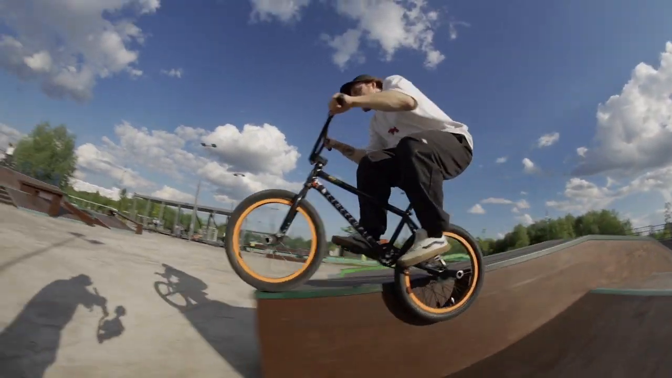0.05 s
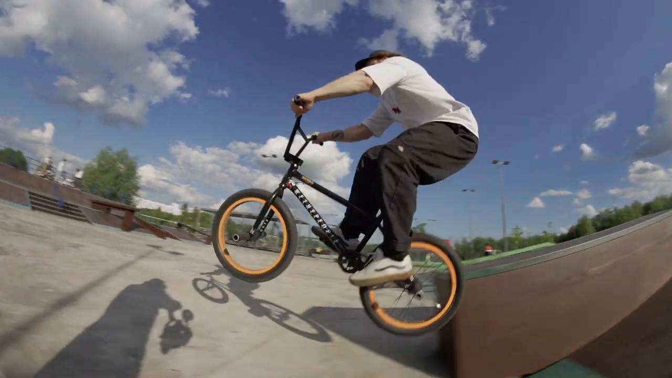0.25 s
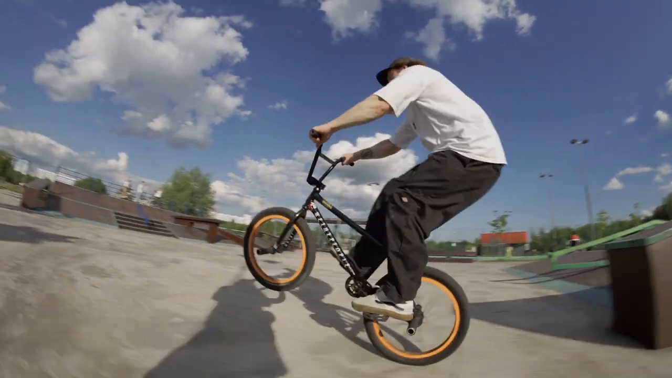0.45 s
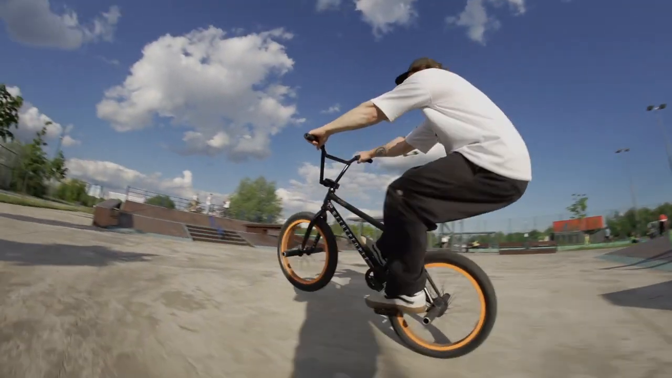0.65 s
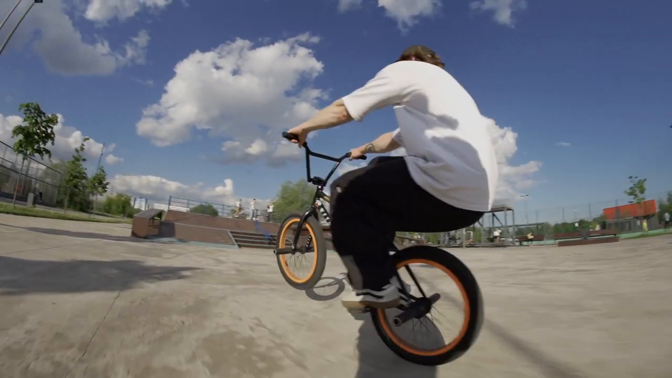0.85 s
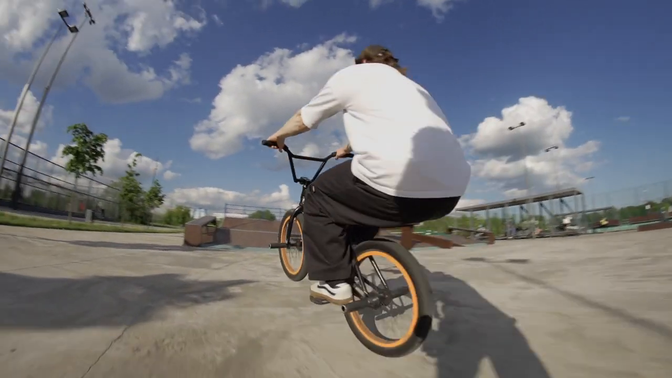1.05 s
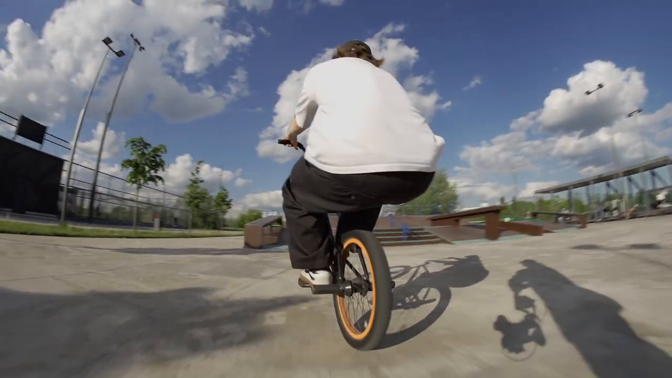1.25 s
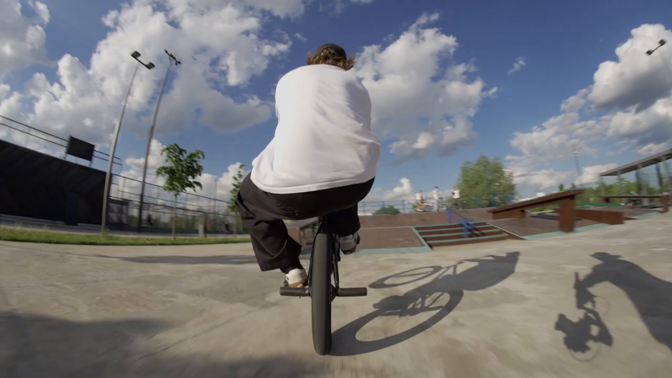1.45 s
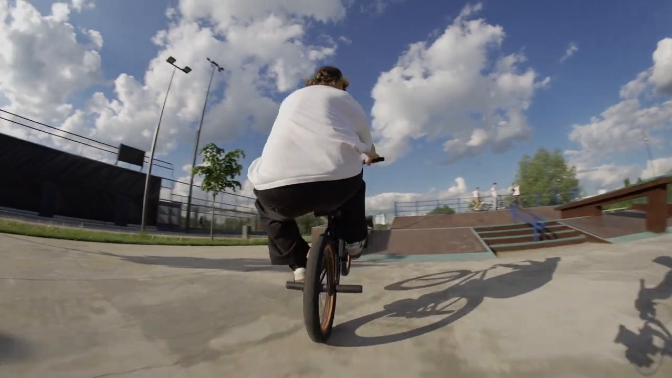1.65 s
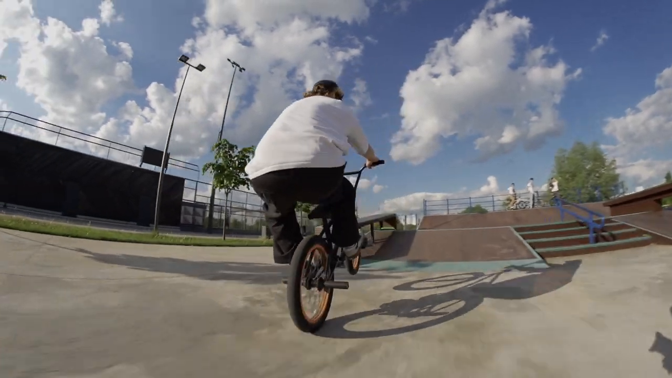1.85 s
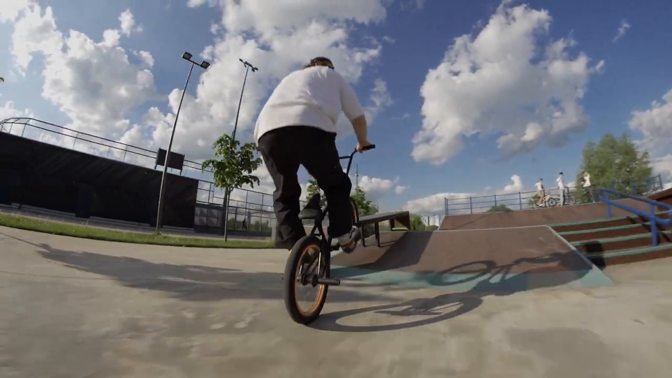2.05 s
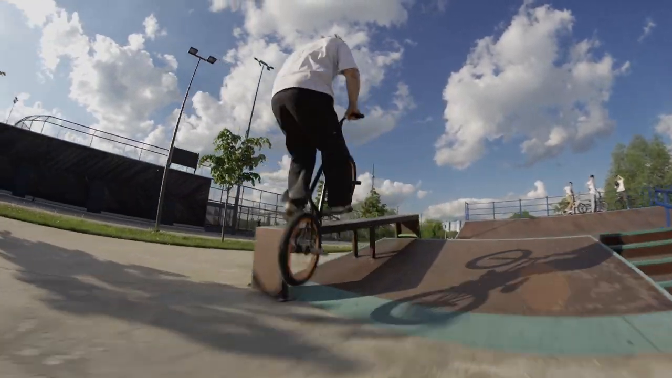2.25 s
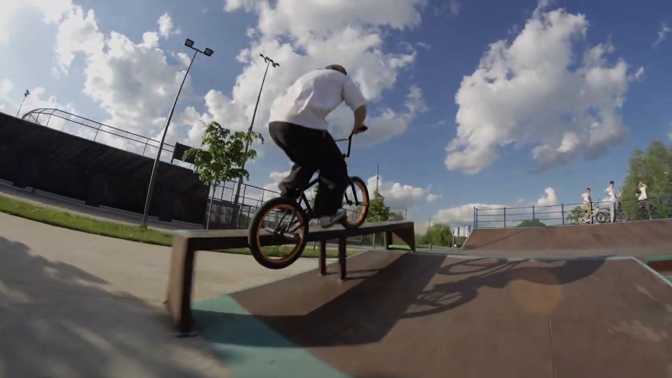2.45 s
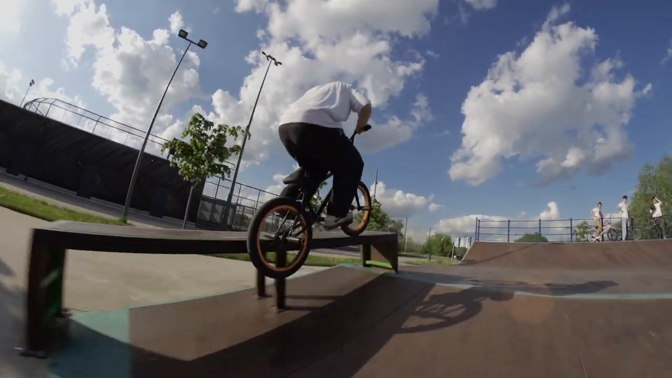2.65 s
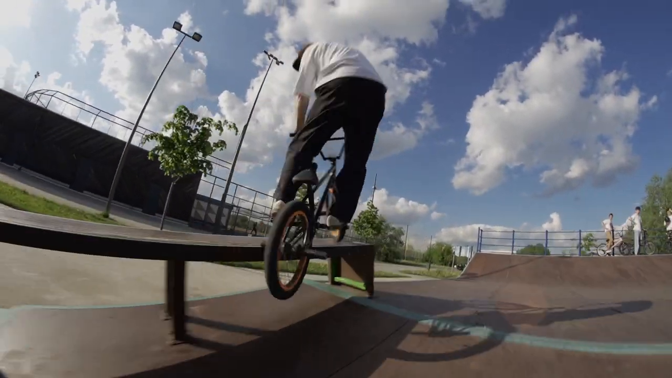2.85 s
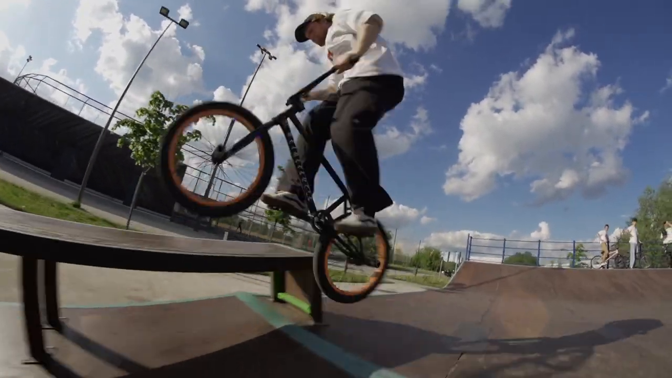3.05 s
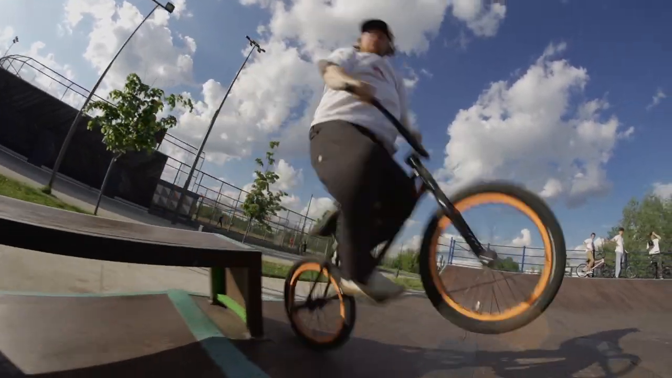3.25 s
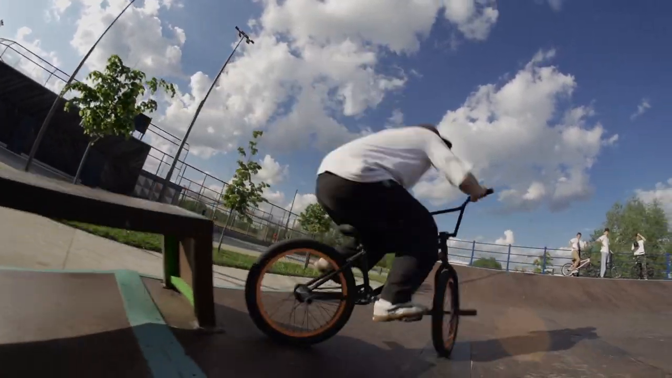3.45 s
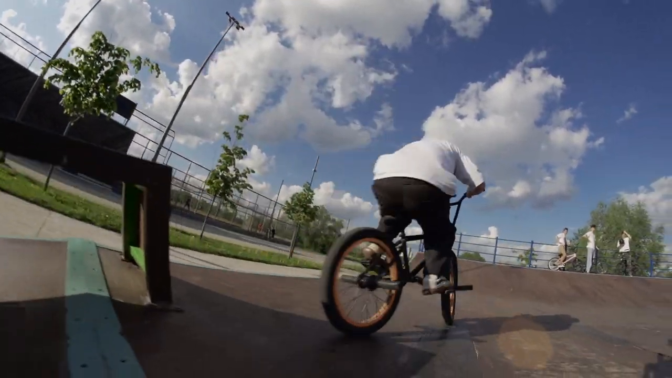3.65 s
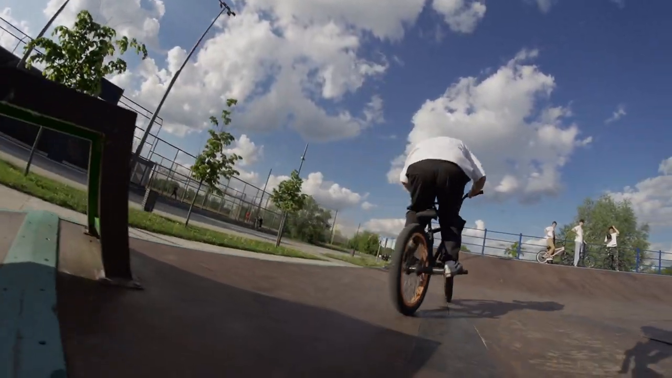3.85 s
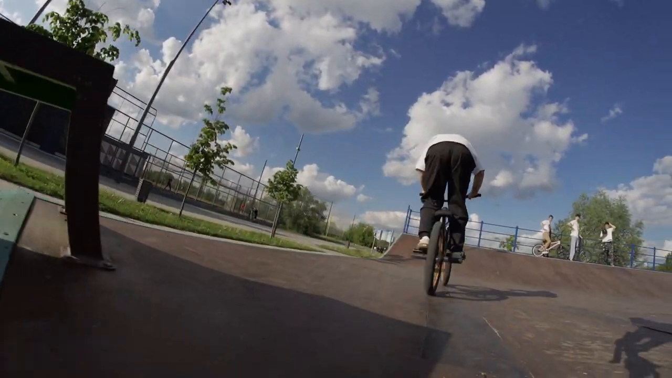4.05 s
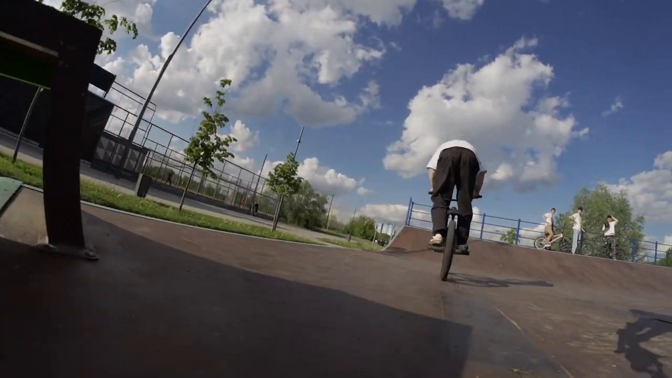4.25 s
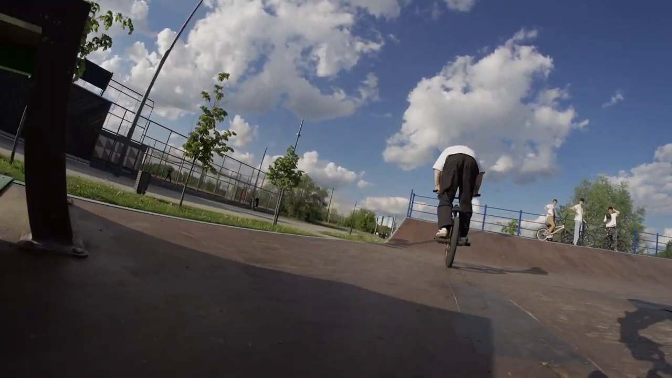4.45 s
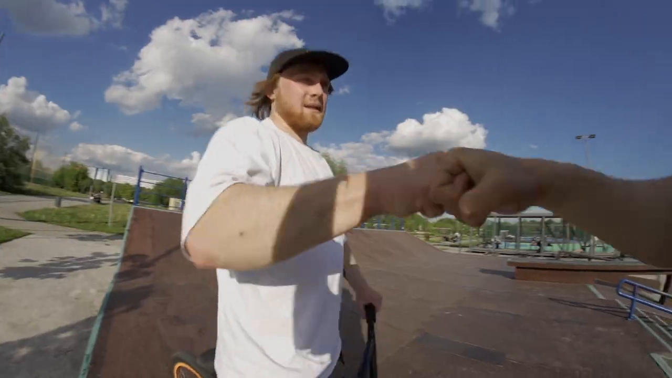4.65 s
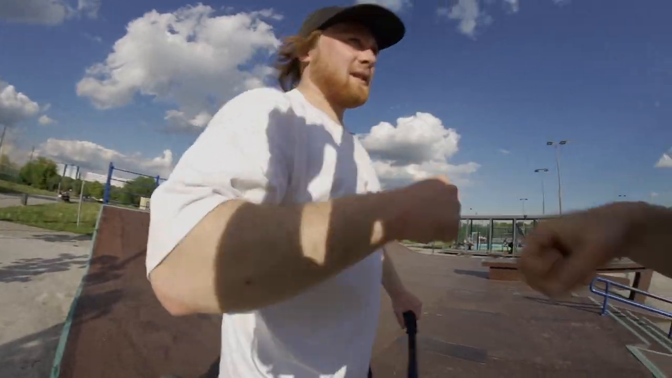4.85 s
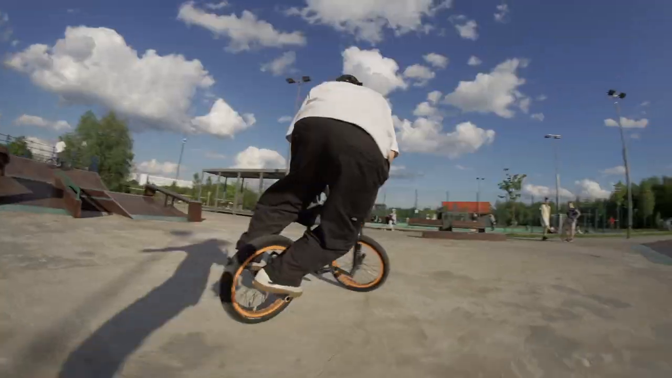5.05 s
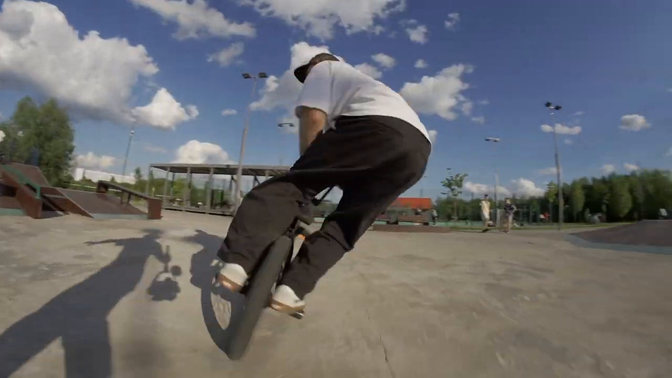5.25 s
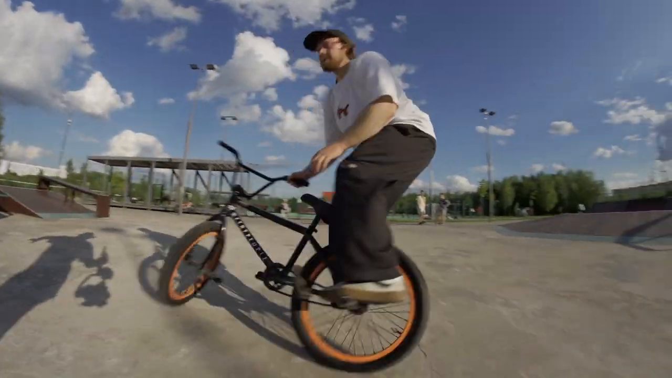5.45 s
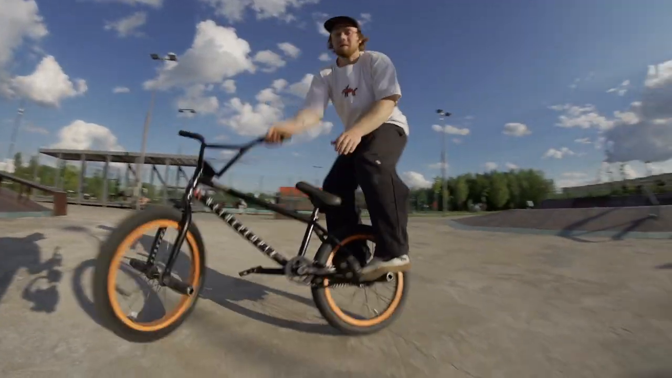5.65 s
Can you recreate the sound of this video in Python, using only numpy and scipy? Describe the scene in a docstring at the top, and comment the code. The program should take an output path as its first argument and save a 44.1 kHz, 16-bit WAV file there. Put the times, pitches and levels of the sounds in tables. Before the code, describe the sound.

Skatepark bike run: hollow rumble, sharp clack, quiet rolling, a ringing metal rail scrape, heavy landing, thin falling squeak, and a gritty tyre skid in wind.

```python
"""A BMX bike in a skatepark: it drums over a hollow ramp, clacks onto concrete, grinds a steel rail and lands on a bank.
A thin squeak falls away, then a tyre skids through a turn, with a fist bump early on; wind rumbles on the microphone.
Rolling, scraping and skidding are random contacts coloured by each surface; blows, ticks and the bump are noise bursts.
Tyre thumps are damped sines, the rail is a set of ringing modes, and rubber squeals are blurred stick-slip tones."""
import sys
import numpy as np
from scipy import signal
from scipy.fft import rfft, irfft, next_fast_len
from scipy.io import wavfile
from scipy.ndimage import uniform_filter1d, map_coordinates

SR = 44100
rng = np.random.default_rng(int(sys.argv[2]) if len(sys.argv) > 2 else 0)


def dump(signal):
    """Clip the signal to [-1, 1] and save it as 16-bit WAV at the path in sys.argv[1]."""
    limited = np.clip(np.atleast_2d(signal).T, -1, 1)
    pcm = np.round(limited * 32767).astype(np.int16)
    wavfile.write(sys.argv[1], SR, pcm)


N = 251811

# In all tables and settings, t60_s is the time to die by 60 dB; attacks and rises build by 60 dB.

# stretches of rolling: touch_down_s, lift_off_s, level_db (at touch-down, before unevenness), t60_s
ROLL_STRETCHES = [(0.251, 0.53, -42.5, 2.1), (0.593, 2.12, -45, 0.16), (2.122, 2.196, -39.5, 0.16),
                  (2.23, 2.29, -50, 2), (2.923, 3.173, -48.5, 1.9), (3.48, 3.542, -48, 2.55),
                  (5.41, 5.616, -54, 1.4)]
# hard blows: start_s, crack_db, thud_db, frame_ring_db (burst levels before trim and colour), crack_t60_s
HARD_BLOWS = [(0.3923, -15.5, -18.5, -11.5, 0.023), (0.3943, -19.5, -19, -9.5, 0.018),
              (0.856, -40, -45, -59, 0.13), (2.27, -39, -41, -66, 0.02), (2.459, -28.5, -26.5, -29.5, 0.63),
              (2.494, -16.5, -30, -21, 0.058), (2.4996, -7, -6, -41, 0.19), (2.658, -22, -17, -33, 0.082),
              (3.1158, -42, -27, -65, 0.38), (3.3129, -7.5, -20, -22.5, 0.017),
              (3.4723, -14.5, -7, -54, 0.046), (3.478, -26, -4, -47, 0.24)]
# soft tyre thumps: start_s, level_db, pitch_hz, t60_s
TYRE_THUMPS = [(0.048, -6.5, 200, 0.062), (.12, -17, 152, .07), (.227, -6.5, 155, 0.06),
               (.272, -9, 305, 0.046), (1.121, -23, 368, 0.039), (1.989, -23, 107, 0.085),
               (2.798, -7, 243, 0.12), (2.822, -12, 383, 0.039), (3.128, -13.5, 73.7, 0.24),
               (3.478, -15, 193, 0.18), (3.488, -11.5, 374, 0.07), (3.497, -9.5, 170, 0.06),
               (4.109, -24.5, 254.3, 0.095), (4.511, -23.5, 248, 0.034), (5.202, -8.5, 131, 0.013),
               (5.307, -6.5, 144.6, 0.14)]
# wheels loading the bank: start_s, shudder_db, t60_s
BANK_LOADS = [(3.135, -21.5, 0.23), (3.325, -16.5, 1), (3.495, -14, 0.37)]
# drops that set loose bike parts rattling: start_s, level_db, t60_s
PART_RATTLES = [(.402, -25.5, 0.3), (3.32, -32.5, 1), (3.485, -33, 0.49)]
# grit and small bike ticks, and a fist bump at 4.628 s: start_s, level_db (before the snap and tail offsets)
TICKS_AND_BUMP = [(0.639, -36.5), (1.295, -41), (1.394, -41), (1.9785, -36.5), (2.8472, -20.5),
                  (3.1838, -33), (3.533, -37), (3.628, -32), (3.639, -30.5), (3.794, -35.5), (4.628, -17)]
# the steel rail's modes: pitch_hz, level_db (within the ring), t60_s
RAIL_MODES = [(1016, -4, 0.17), (1146, 5, 0.49), (1253, 0.5, 0.27), (1370, 1, 0.5), (1642, -14, 0.33),
              (1733, -12, 0.4), (1846, -5.5, 0.29), (1985, -12, 0.29)]
# the bike frame's resonances: centre_hz, width_hz, gain_db
FRAME_RESONANCES = [(3230, 425, 11), (3820, 1400, 1.5), (5800, 480, -1.5), (7600, 880, -0.5)]
# the skidding tyre's resonances: centre_hz, width_hz, gain_db
TYRE_RESONANCES = [(1080, 480, 0.5), (2310, 380, 5), (3150, 200, 4.5)]
# harder scuffs of the tyre within the turn: start_s, slip_hz, level_db
TYRE_SCUFFS = [(5.032, 1130, -38), (5.065, 1130, -39), (5.115, 1118, -30), (5.18, 1150, -29.5),
               (5.414, 812, -29.5)]
# squeals of a tyre at the ramp's lip, the peg at the rail's end and the landing tyre:
# start_s, end_s, pitch_hz, glide_hz_per_s, level_db
SHORT_SQUEALS = [(0.241, 0.286, 2390, 1201, -39), (2.815, 2.874, 5460, 16000, -43),
                 (3.43, 3.469, 4520, -1000, -30)]
# path of the thin falling squeak: time_s, pitch_hz, level_db
THIN_SQUEAK = [(4.09, 2370, -73), (4.166, 2230, -57.5), (4.22, 2180, -46.5), (4.277, 2040, -48),
               (4.323, 2030, -48.5), (4.362, 2186, -70), (4.412, 1980, -52), (4.492, 1895, -62)]
# wind gusts on the microphone: peak_s, level_db
WIND_GUSTS = [(.57, -23), (1.28, -23), (1.52, -14), (1.95, -27.5), (2.38, -19.5), (3.18, -26),
              (3.42, -23.5), (4.759, -21.5), (4.92, -13.5), (5.2, -15)]

# Colours give relative balance only; columns of each: frequency_hz, gain_db
# tyre tread on concrete: frequency_hz, gain_db
CONCRETE_COLOUR = [(90, -1.5), (230, -9), (380, -8), (900, -15.5), (1300, -16), (3400, -28), (5000, -33.5),
                   (7700, -33), (10500, -42.5), (16000, -43.5)]
# boom of the hollow ramp, also the slap under a thump: frequency_hz, gain_db
BOOM_COLOUR = [(60, -31.5), (95, -5), (152, 4), (215, -7), (480, -6.5), (900, -21.5)]
# tread on the ramp: frequency_hz, gain_db
TREAD_COLOUR = [(600, -4.5), (1000, 1.5), (1660, -7.5), (2600, -14.5), (4000, -23.5), (8000, -31.5),
                (11000, -40), (16000, -40.5)]
# crack of a blow: frequency_hz, gain_db
CRACK_COLOUR = [(150, -13), (500, 16), (2000, 7), (4000, 2), (8000, -7.5), (11000, -19), (16000, -20)]
# thud of the struck surface: frequency_hz, gain_db
THUD_COLOUR = [(30, -6.5), (100, -5.5), (220, 3.5), (500, -4), (1000, -14), (2500, -24.5)]
# shuddering bank: frequency_hz, gain_db
SHUDDER_COLOUR = [(40, 3.5), (100, 4.5), (160, -1), (400, -7), (650, -17), (1000, -23)]
# loose bike parts: frequency_hz, gain_db
PARTS_COLOUR = [(300, 10), (700, 5), (3000, -2.5), (6000, -9), (10000, -14.5), (16000, -15.5)]
# ledge shaken by the grind: frequency_hz, gain_db
LEDGE_COLOUR = [(70, -5.5), (140, -4), (215, 1), (400, -3), (600, -5), (900, -15.5)]
# peg scraping on steel: frequency_hz, gain_db
SCRAPE_COLOUR = [(600, -12), (1000, -5), (1250, 3), (1550, -6.5), (2000, -6.5), (3300, -16), (6000, -37)]
# fine hiss of the grind: frequency_hz, gain_db
HISS_COLOUR = [(3500, -0.5), (6200, -2.5), (9000, -4), (10500, -16), (16000, -13.5)]
# rubber rubbing sideways: frequency_hz, gain_db
RUB_COLOUR = [(150, -12), (330, -11), (700, -12), (1600, -16), (3000, -21.5), (4400, -21), (5600, -30),
              (7300, -27.5), (10500, -49)]
# sprayed grit: frequency_hz, gain_db
GRIT_COLOUR = [(1500, -16), (3000, 3), (5000, 1), (6500, -4), (8500, 2), (13000, 1), (16000, -3)]
# rough tyre drag: frequency_hz, gain_db
DRAG_COLOUR = [(2200, -8), (4600, 1), (7000, -18), (9500, -12), (15000, -23)]
# wind buffeting the microphone: frequency_hz, gain_db
BUFFET_COLOUR = [(12, 8), (22, 6), (45, -11), (65, -15), (150, -33.5)]
# ticks and the fist bump: frequency_hz, gain_db
TICK_COLOUR = [(400, 2.0), (3000, -3.0), (8000, 1.5), (16000, -15.0)]

ROLL_GROWS_DB_PER_S = 0.5  # within each stretch
TOUCH_S = 0.066  # how fast a rolling tyre's sound builds at touch-down
AIR_DB = -56.5  # the open park, before the unevenness shared with the rolling
RAMP_END_S, RAMP_BOOM_DB, RAMP_T60_S = 0.282, -19, 0.24
# the tread bites hardest in the curve of the ramp
TREAD_PEAK_S, TREAD_RISE_S, RAMP_TREAD_DB = 0.029, 5.9, -23.5
TREAD_T60_S, TREAD_SAG_DB_PER_S = 0.12, 33.5
SLAP_DB, SLAP_T60_S = -15, 0.043  # the slap under each thump, relative to its note
PEG_ON_S, PEG_OFF_S = 2.502, 2.906  # the peg lands on the rail and leaves it
PEG_ATTACK_S, PEG_RELEASE_S = 0.02, 0.26
LEDGE_DB, LEDGE_SAG_DB_PER_S = -12.5, 32
SCRAPE_DB, SCRAPE_SAG_DB_PER_S = -14, 64.5
HISS_DB, HISS_SAG_DB_PER_S = -39, 11.5
SKID_START_S, SKID_PEAK_S, SKID_END_S = 4.471, 5.092, 5.44  # breaks loose, slides fastest, grips again
SKID_ATTACK_S, SKID_RELEASE_S = 0.086, 0.27
RUB_DB, RUB_GROWS_DB_PER_S, RUB_END_S, RUB_T60_S = -46, 12.5, 5.616, 0.59
GRIT_DB, GRIT_RISE_DB_PER_S, GRIT_FALL_DB_PER_S = -35, 21.5, 25  # level at the fastest slide
CHATTER_HZ, CHATTER_DB = 1170, -38.5  # at the fastest slide
CHATTER_SPAN_S, CHATTER_DROP_HZ, CHATTER_DROP_DB = 0.25, 93, 9.5  # so much lower and weaker at this distance
CHATTER_WANDER_HZ = 45.35  # the load on the tyre keeps shifting
SCUFF_RISE_S, SCUFF_FALL_S = 0.083, 0.089
SCUFF_SPRAY_DB = -12  # grit thrown up by a scuff, relative to its squeal
SCRATCH_FROM_S, SCRATCH_TO_S, SCRATCH_DB = 4.83, 4.94, -40
SQUEAL_RISE_S, SQUEAL_FALL_S, SQUEAL_WAVER_HZ = 0.19, 0.072, 162.2
DRAG_FROM_S, DRAG_TO_S, DRAG_DB = 3.335, 3.467, -36.5
CALM_DB, GUST_RISE_S, GUST_FALL_S = -48, 1.7, 1.4  # calm is the wind between gusts
TOP_HZ = 16000  # the top of the finished sound's band


def rolling():
    """Tread blocks patter on concrete over the park's faint hush, and drum on the hollow ramp."""
    stretches = [envelope(on, off, db, TOUCH_S, t60, -ROLL_GROWS_DB_PER_S)
                 for on, off, db, t60 in ROLL_STRETCHES]
    contact = np.max(stretches, axis=0)
    uneven = amp(1 + 0.8 * wobble(14))  # flutters around a 1 dB lift
    patter = patchy(grains(CONCRETE_COLOUR, rate=12000, spread_db=1.77), depth_db=2.5, size=512)
    concrete = uneven * np.hypot(contact, amp(AIR_DB)) * patter

    boom = envelope(0, RAMP_END_S, RAMP_BOOM_DB, TOUCH_S, RAMP_T60_S)
    tread = envelope(TREAD_PEAK_S, RAMP_END_S, RAMP_TREAD_DB, TREAD_RISE_S, TREAD_T60_S, TREAD_SAG_DB_PER_S)
    ramp = boom * patchy(grains(BOOM_COLOUR, rate=4000, spread_db=1), depth_db=4.5, size=2048)
    ramp += tread * patchy(grains(TREAD_COLOUR, rate=6000, spread_db=1), depth_db=4.5, size=512)
    return concrete + ramp


def blows():
    """Each blow is a sharp crack, a thud of the surface and a short ring of the frame."""
    cracks, thuds, rings = np.zeros((3, N))
    for s, crack_db, thud_db, ring_db, crack_t60 in HARD_BLOWS:
        add(cracks, s, amp(crack_db - 0.5) * burst(crack_t60))
        add(thuds, s, amp(thud_db) * burst(0.083))
        add(rings, s, amp(ring_db + 8.5) * burst(0.017))
    return coloured(cracks, CRACK_COLOUR) + coloured(thuds, THUD_COLOUR) + resonate(rings, FRAME_RESONANCES)


def thumps():
    """A loaded tyre gives one low damped note, with a little slap."""
    notes, slaps = np.zeros((2, N))
    t = np.arange(SR // 2) / SR
    onset = 1 - np.exp(-t / 0.00069)  # softens the first millisecond
    for s, db, hz, t60 in TYRE_THUMPS:
        add(notes, s, amp(db - 60 * t / t60) * onset * np.sin(2 * np.pi * hz * t))
        add(slaps, s, amp(db + SLAP_DB) * burst(SLAP_T60_S))
    return notes + coloured(slaps, BOOM_COLOUR)


def landings():
    """Jolts set the bank shuddering and loose bike parts rattling, and both settle at their own pace."""
    bank = shaken(BANK_LOADS, attack=0.042) * grains(SHUDDER_COLOUR, rate=4000, spread_db=2.5)
    parts = shaken(PART_RATTLES, attack=0.012) * grains(PARTS_COLOUR, rate=7200, spread_db=4)
    return bank + parts


def peg_slide(db, sag_db_per_s):
    """Gain of one layer while the peg rubs the rail, pressing ever more lightly."""
    return envelope(PEG_ON_S, PEG_OFF_S, db, PEG_ATTACK_S, PEG_RELEASE_S, sag_db_per_s)


def rail_ring(scrape):
    """Each steel mode stores the scraping energy and lets it go at its own speed."""
    t = clock()
    ring = np.zeros(N)
    for hz, db, t60 in RAIL_MODES:
        memory = amp(-120 * t[:SR] / t60)  # energy decay: 60 dB is a factor of a million
        energy = np.abs(signal.fftconvolve(scrape ** 2, memory / memory.sum())[:N])
        level = amp(db + 1.5 * wobble(25)) * np.sqrt(energy)
        ring += level * np.sin(2 * np.pi * hz * t + 0.6 * wobble(25))
    # the ring is damped as the peg nears the end of the rail
    return np.interp(t, [2.68, 3.0], [1, 0]) * ring


def grind():
    """The peg scrapes along the steel, shaking the ledge and keeping the rail's modes ringing."""
    boom = peg_slide(LEDGE_DB, LEDGE_SAG_DB_PER_S)
    scrape = peg_slide(SCRAPE_DB, SCRAPE_SAG_DB_PER_S)
    hiss = peg_slide(HISS_DB, HISS_SAG_DB_PER_S)
    rasp = scrape * patchy(grains(SCRAPE_COLOUR, rate=7000, spread_db=1.9), depth_db=3.5, size=2048)
    ledge = boom * patchy(grains(LEDGE_COLOUR, rate=6000, spread_db=0.5), depth_db=2.5, size=1024)
    sizzle = hiss * patchy(grains(HISS_COLOUR, rate=20000, spread_db=1.5), depth_db=4, size=256)
    return ledge + rasp + amp(-8.5) * rail_ring(scrape) + sizzle


def skid_chatter(late):
    """The tyre grips and slips highest and loudest at the fastest slide, late = 0 s."""
    slowing = (late / CHATTER_SPAN_S) ** 2
    pitch = CHATTER_HZ - CHATTER_DROP_HZ * slowing + CHATTER_WANDER_HZ * wobble(19)
    gain = amp(CHATTER_DB - CHATTER_DROP_DB * slowing)
    return gain * stick_slip(pitch, [-4.5, -14, -9, 3.5], width_hz=300, rough=0.86)


def skid():
    """Rubber rubs sideways over the concrete, spraying grit and chattering higher as it slides faster."""
    late = clock() - SKID_PEAK_S
    rub = envelope(SKID_START_S, RUB_END_S, RUB_DB, SKID_ATTACK_S, RUB_T60_S, -RUB_GROWS_DB_PER_S)
    body = rub * patchy(grains(RUB_COLOUR, rate=20000, spread_db=1.5), depth_db=3, size=1024)

    # each scuff bites briefly into the concrete and throws up more grit
    bites = [envelope(s, s, db, SCUFF_RISE_S, SCUFF_FALL_S) for s, _, db in TYRE_SCUFFS]
    bite = np.max(bites, axis=0)
    scuff_pitch = curves(TYRE_SCUFFS)[0]
    scuffs = bite * stick_slip(scuff_pitch, [-20, -5, -7, 4], width_hz=610, rough=0.9)

    grit_db = GRIT_DB - np.maximum(-late * GRIT_RISE_DB_PER_S, late * GRIT_FALL_DB_PER_S)
    grit = envelope(SKID_START_S, SKID_END_S, grit_db, SKID_ATTACK_S, SKID_RELEASE_S)
    spatter = patchy(grains(GRIT_COLOUR, rate=24000, spread_db=2), depth_db=2.5, size=512)
    spray = (grit + amp(SCUFF_SPRAY_DB) * bite) * spatter

    # two passes through the tyre sharpen its resonances
    tyre = resonate(grains(RUB_COLOUR, rate=3600, spread_db=2), TYRE_RESONANCES)
    tyre = unit(resonate(tyre, TYRE_RESONANCES))
    scratch = envelope(SCRATCH_FROM_S, SCRATCH_TO_S, SCRATCH_DB, attack=0.65, release=2.1) * tyre
    judder = amp(1.3 * wobble(40))
    return body + judder * (spray + skid_chatter(late) + scratch) + scuffs


def squeals():
    """Rubber and steel stick and slip in short, ragged squeals."""
    out = np.zeros(N)
    for start, end, hz, glide, db in SHORT_SQUEALS:
        glided = glide * (np.clip(clock(), start, end) - start)
        pitch = hz + glided + SQUEAL_WAVER_HZ * wobble(110)
        gain = envelope(start, end, db, SQUEAL_RISE_S, SQUEAL_FALL_S)
        out += gain * stick_slip(pitch, [0, -13], width_hz=430, rough=0.57)
    return out


def squeaks():
    """The rear tyre drags roughly on landing; later a nearly pure stick-slip tone squeaks and falls."""
    scrub = patchy(grains(DRAG_COLOUR, rate=4800, spread_db=0.5), depth_db=10, size=256)
    drag = envelope(DRAG_FROM_S, DRAG_TO_S, DRAG_DB, attack=0.03, release=0.12) * scrub
    hz, db = curves(THIN_SQUEAK)
    thin = envelope(THIN_SQUEAK[0][0], THIN_SQUEAK[-1][0], db, attack=0.03, release=0.19)
    return drag + thin * stick_slip(hz, [0], width_hz=79, rough=0.16)


def ticks_and_bump():
    """Grit and small bike ticks, and a fist bump: each a 2 ms snap over a weaker 35 ms tail."""
    out = np.zeros(N)
    for s, db in TICKS_AND_BUMP:
        snap = amp(db + 1.5) * burst(0.002)
        tail = amp(db - 13) * burst(0.035)
        add(out, s, snap + tail)
    return coloured(out, TICK_COLOUR)


def wind():
    """Gusts swell and die; their slow eddies push on the microphone."""
    gusts = [envelope(s, s, db, GUST_RISE_S, GUST_FALL_S) for s, db in WIND_GUSTS]
    strength = np.hypot(np.max(gusts, axis=0), amp(CALM_DB))
    eddies = signal.hilbert(coloured(rng.standard_normal(N), BUFFET_COLOUR))
    evened = eddies.real / np.abs(eddies) ** 0.35  # narrows the swing between weak and strong eddies
    return strength * unit(evened)


def stick_slip(pitch, partials_db, width_hz, rough):
    """Rubber gripping and slipping, rms 1: uneven slips blur each partial into a narrow, fluttering band."""
    phase = 2 * np.pi * np.cumsum(pitch) / SR
    tone = np.zeros(N)
    for k, db in enumerate(partials_db, 1):
        width = width_hz * np.sqrt(k)  # overtones blur more
        slips = 1 - rough + rough * (wobble(width) + 1j * wobble(width))
        tone += amp(db) * (slips * np.exp(1j * k * phase)).real
    grip = amp(2.5 * rough * wobble(45))
    return unit(grip * tone)


def grains(spectrum, rate, spread_db):
    """Tiny random contacts, rate a second, of uneven size through a body's colour, rms 1."""
    hits = rng.random(N) < rate / SR
    sizes = rng.standard_normal(N) * amp(spread_db * wobble(150))
    return unit(coloured(hits * sizes, spectrum))


def patchy(x, depth_db, size):
    """Narrow resonances swell and fade as the contact point moves, rms 1; a longer size narrows them."""
    z = signal.stft(x, nperseg=size)[2]
    field = uniform_filter1d(rng.standard_normal(z.shape), size=2, axis=0)  # across frequency
    field = uniform_filter1d(field, size=8, axis=1)  # across time
    return unit(signal.istft(z * amp(depth_db * unit(field)), nperseg=size)[1][:N])


def shaken(rows, attack):
    """Gain of something jolted at each (start_s, level_db, t60_s) and left to settle."""
    return np.linalg.norm([envelope(s, s, db, attack, t60) for s, db, t60 in rows], axis=0)


def resonate(x, modes):
    """x through a body's (centre_hz, width_hz, gain_db) resonances, added with alternating sign."""
    def response(f):
        total = 0
        for k, (centre, width, db) in enumerate(modes):
            damping = 1j * f * width
            total = total + (-1) ** k * amp(db) * damping / (centre ** 2 - f ** 2 + damping)
        return total
    return filtered(x, response)


def coloured(x, spectrum, size=8192):
    """x through a causal, minimum-phase filter of unit energy shaped by (frequency_hz, gain_db) points."""
    f, db = np.transpose(spectrum)
    hz = np.fft.rfftfreq(size, 1 / SR) + 1
    octaves_beyond = np.maximum(np.log2(f[0] / hz), 0) + np.maximum(np.log2(hz / f[-1]), 0)
    gain = amp(np.interp(np.log(hz), np.log(f), db) - 24 * octaves_beyond)
    # folding the cepstrum puts the filter's energy as early as it can be
    cepstrum = irfft(np.log(gain + 1e-6))
    cepstrum[1:size // 2] *= 2
    cepstrum[size // 2 + 1:] = 0
    kernel = irfft(np.exp(rfft(cepstrum)))
    return signal.fftconvolve(x, kernel / np.linalg.norm(kernel))[:N]


def filtered(x, response):
    """x times a response of frequency, zero-padded against wrap-around."""
    m = next_fast_len(N + SR // 2)
    return irfft(rfft(x, m) * response(np.fft.rfftfreq(m, 1 / SR)), m)[:N]


def envelope(start, end, db, attack, release, sag_db_per_s=0):
    """Gain that rises 60 dB in attack seconds up to start, sags until end, then falls 60 dB in release."""
    t = clock()
    outside = np.maximum(start - t, 0) / attack + np.maximum(t - end, 0) / release
    sag = sag_db_per_s * (np.clip(t, start, end) - start)
    return amp(db - 60 * outside - sag)


def curves(rows):
    """One value per sample for each column after the time."""
    s, *cols = np.transpose(rows)
    return [np.interp(clock(), s, c) for c in cols]


def wobble(rate):
    """A smooth random curve, rate knots a second."""
    knots = rng.standard_normal(int(N * rate / SR) + 4)
    return map_coordinates(knots, [np.arange(N) * rate / SR])


def burst(t60):
    """Half a second of dying noise."""
    t = np.arange(SR // 2) / SR
    return rng.standard_normal(len(t)) * amp(-60 * t / t60)


def add(track, s, sound):
    """Mix a sound into a track at s seconds."""
    part = track[round(s * SR):][:len(sound)]
    part += sound[:len(part)]


def clock():
    """The time of every sample, in seconds."""
    return np.arange(N) / SR


def amp(db):
    """Decibels to gain."""
    return 10 ** (np.asarray(db) / 20)


def unit(x):
    """Scale to rms 1."""
    return x / np.sqrt(np.mean(x ** 2) + 1e-20)


def scene():
    """The bike in the open air, a fist bump, and the wind."""
    riding = rolling() + blows() + thumps() + landings() + grind() + skid() + squeals() + squeaks()
    return (riding + ticks_and_bump() + wind())[None]


def record(dry):
    """Round off the loudest peaks smoothly, then cut steeply above the top of the band."""
    held = dry[0] / (1 + np.abs(dry[0]) ** 4) ** (1 / 4)
    return filtered(held, lambda hz: 1 / np.sqrt(1 + (hz / TOP_HZ) ** 160))[None]


dry = scene()
out = record(dry)
dump(out)
```